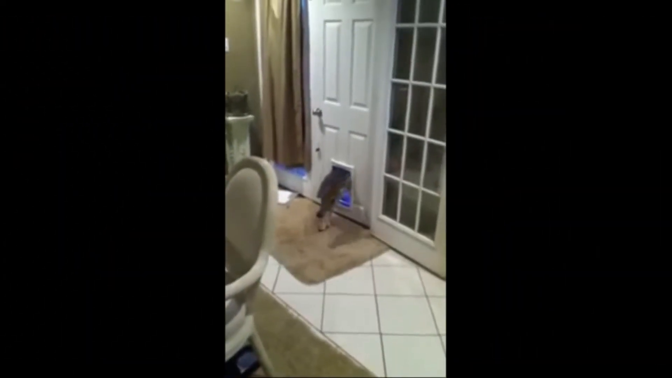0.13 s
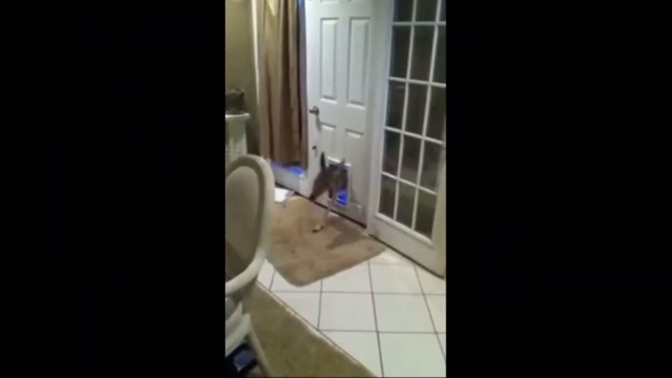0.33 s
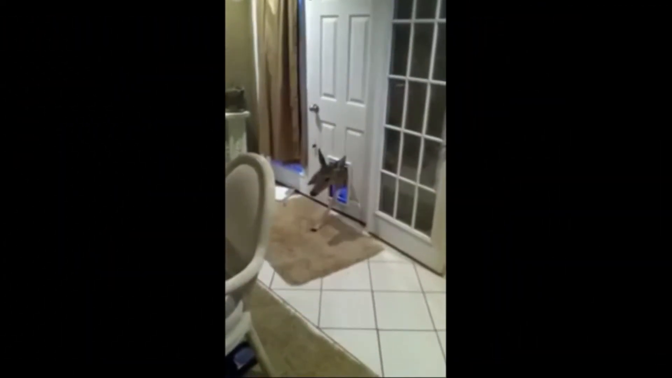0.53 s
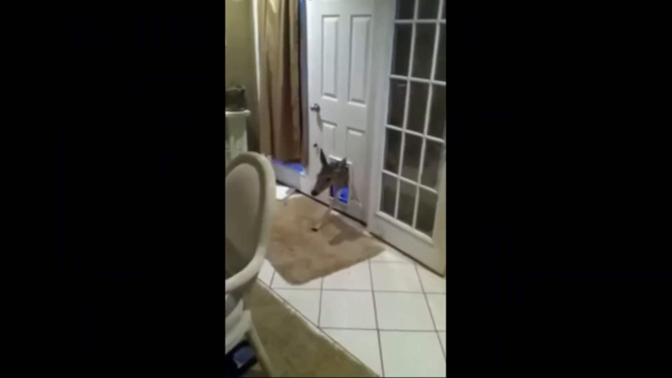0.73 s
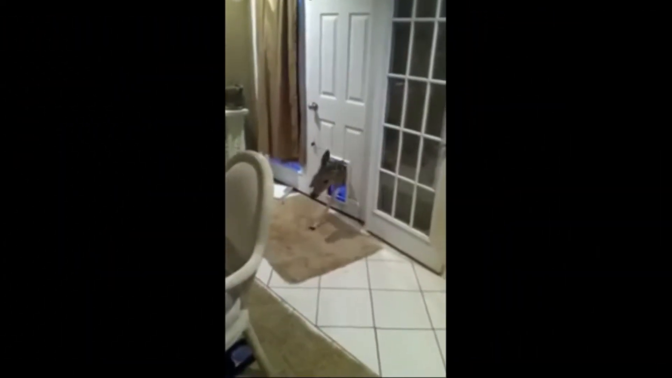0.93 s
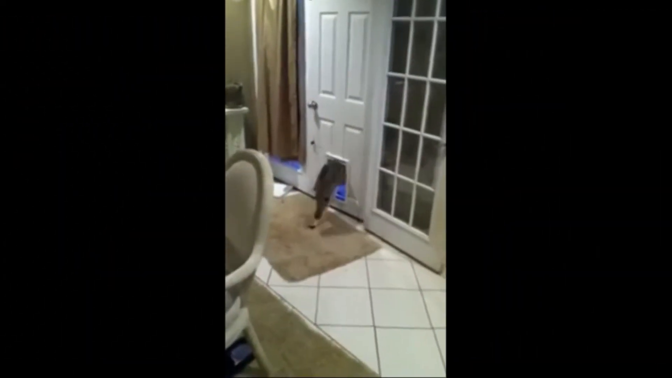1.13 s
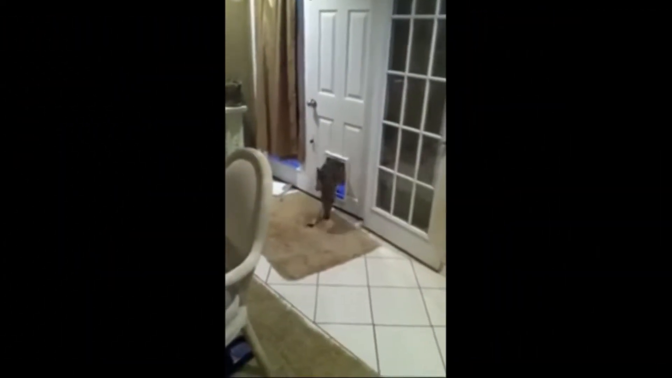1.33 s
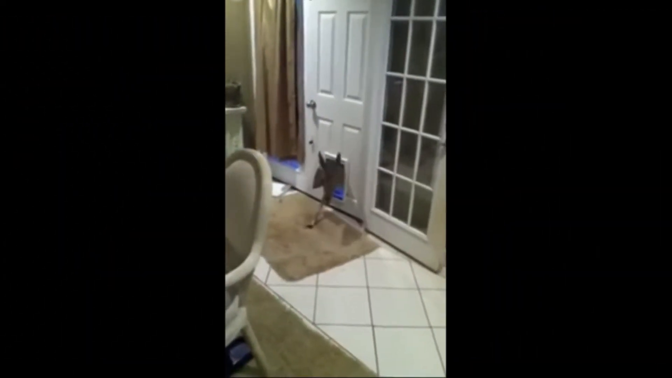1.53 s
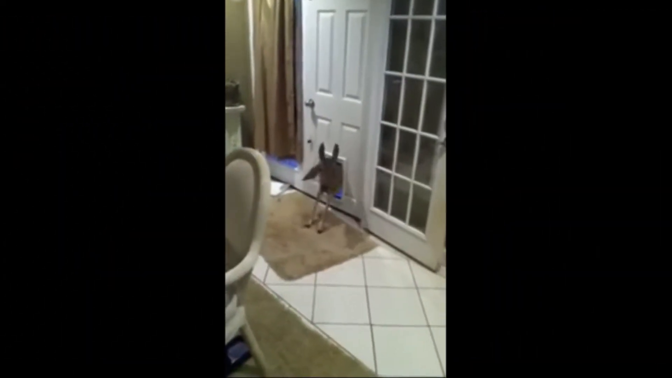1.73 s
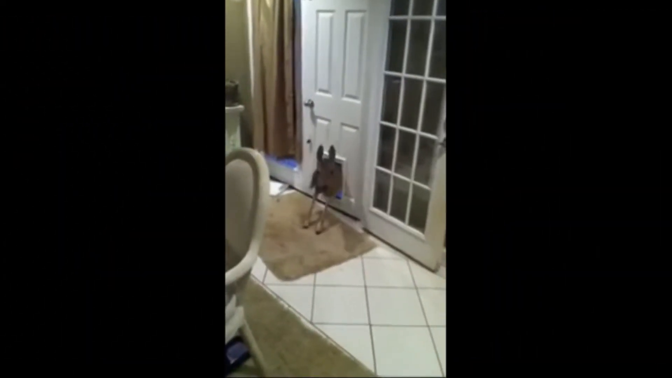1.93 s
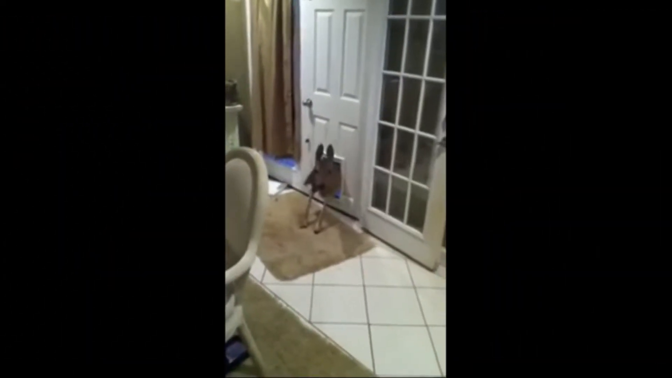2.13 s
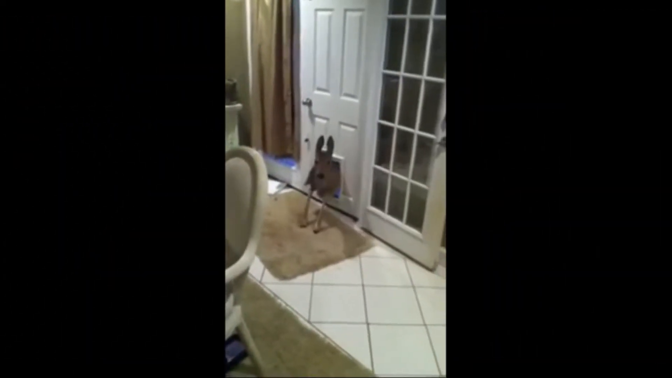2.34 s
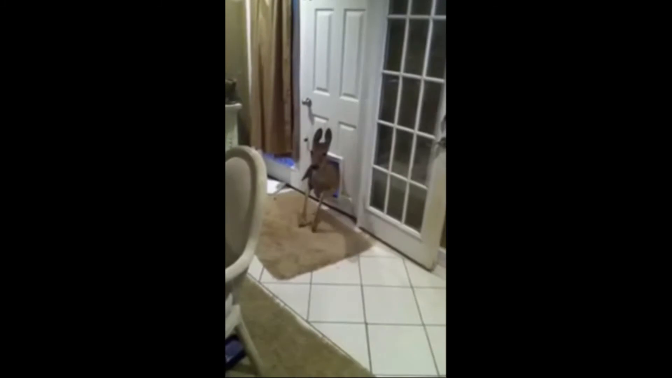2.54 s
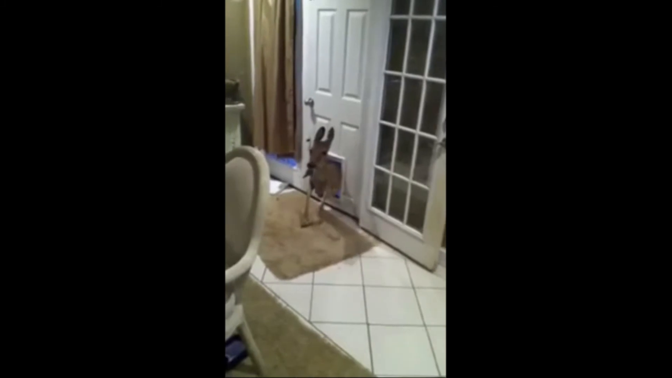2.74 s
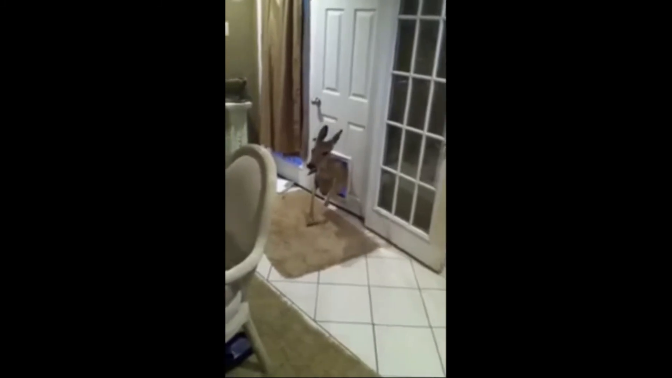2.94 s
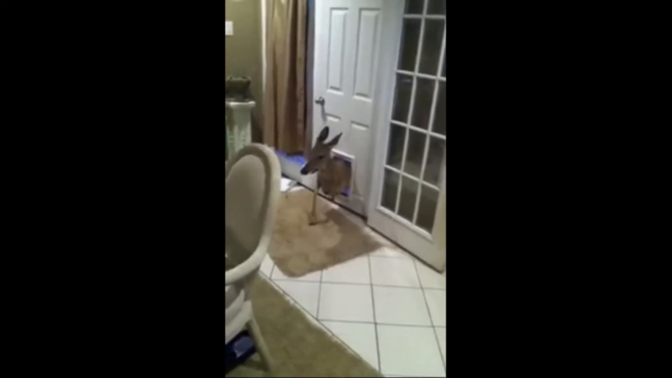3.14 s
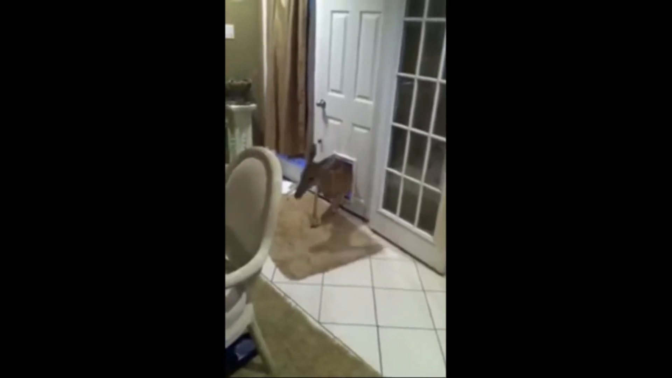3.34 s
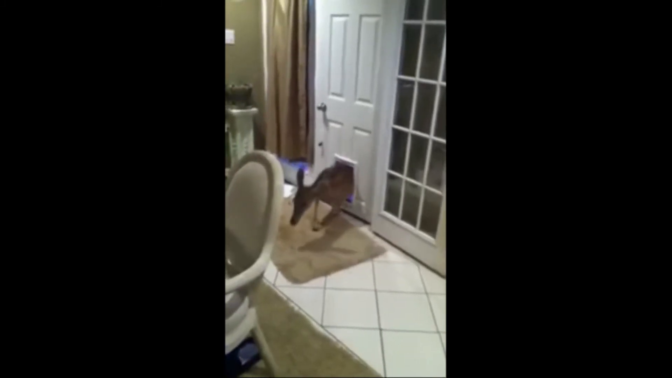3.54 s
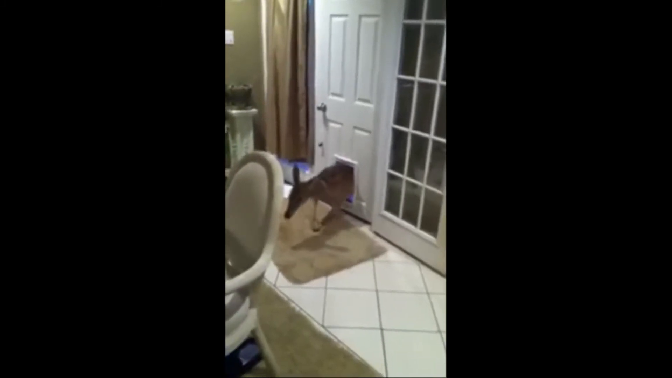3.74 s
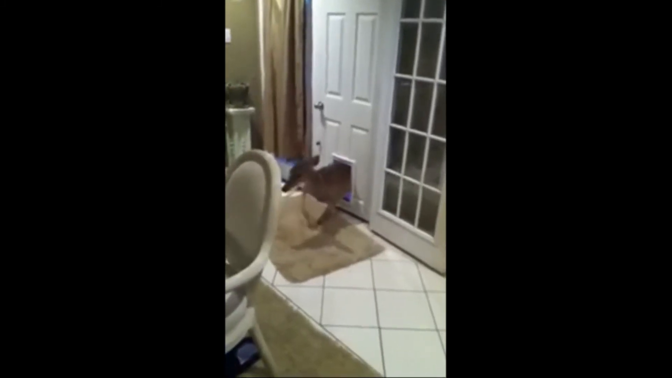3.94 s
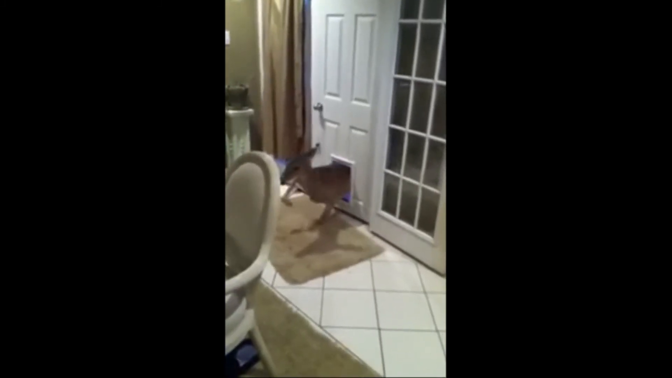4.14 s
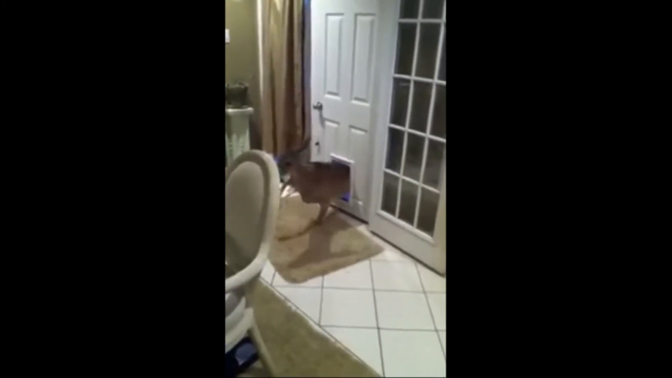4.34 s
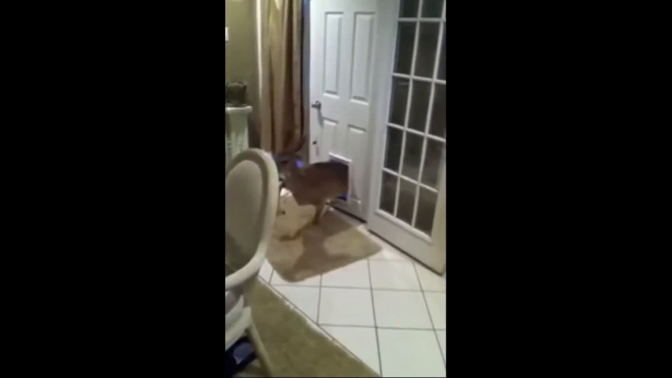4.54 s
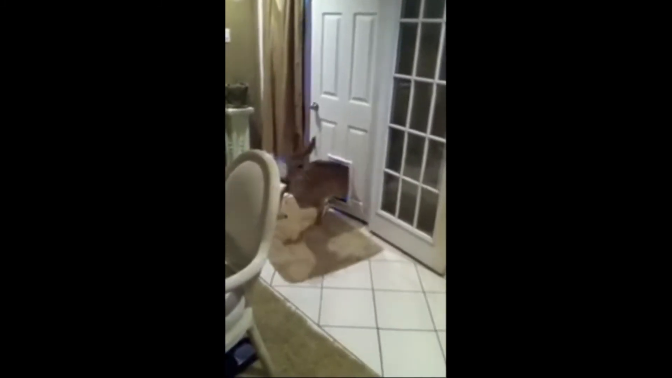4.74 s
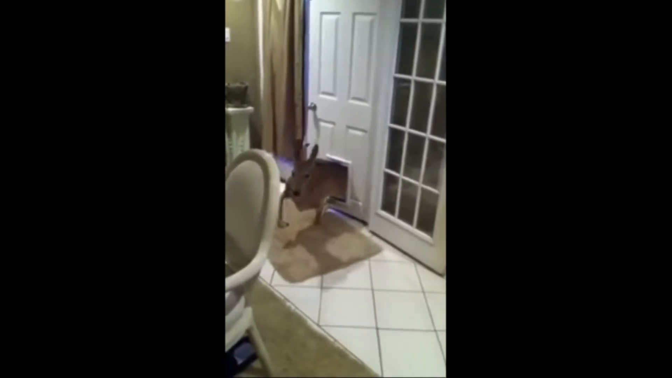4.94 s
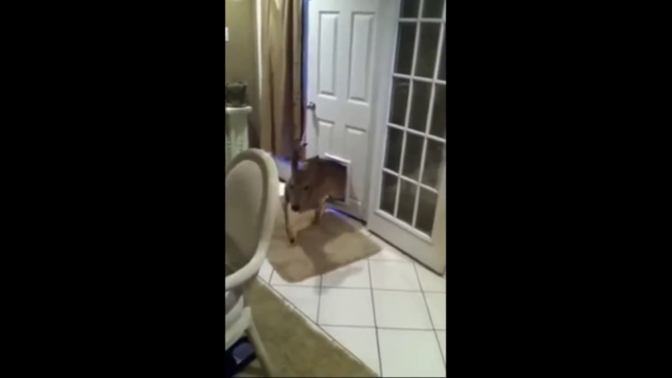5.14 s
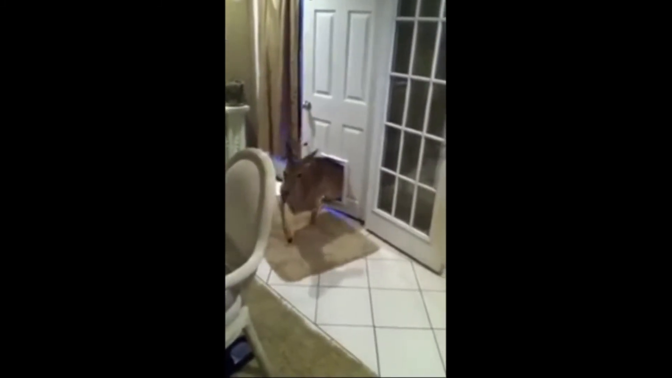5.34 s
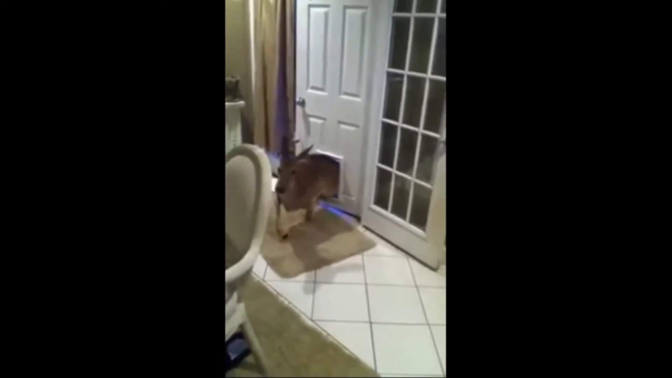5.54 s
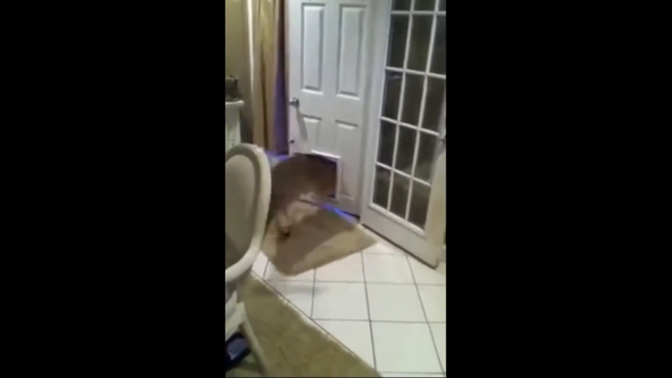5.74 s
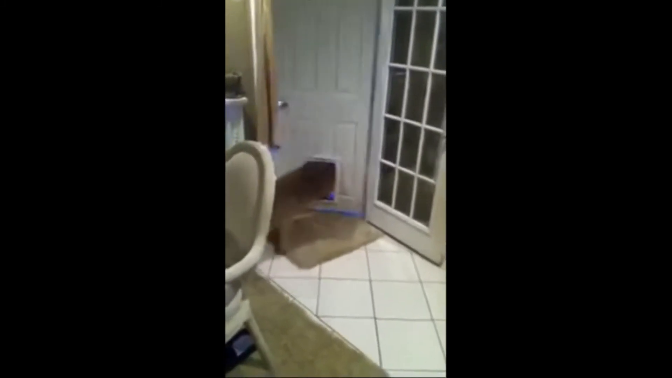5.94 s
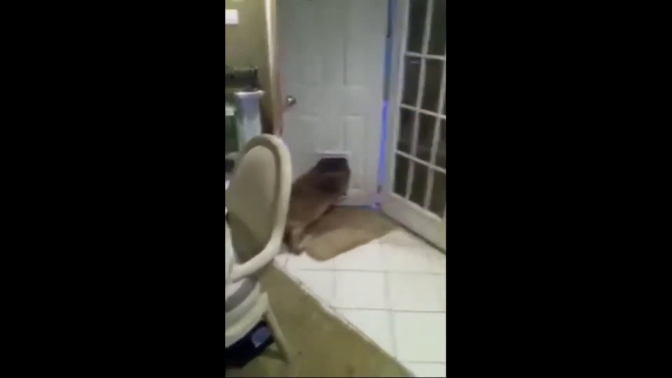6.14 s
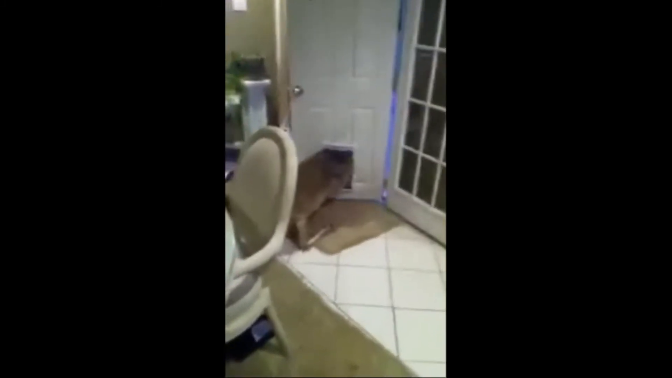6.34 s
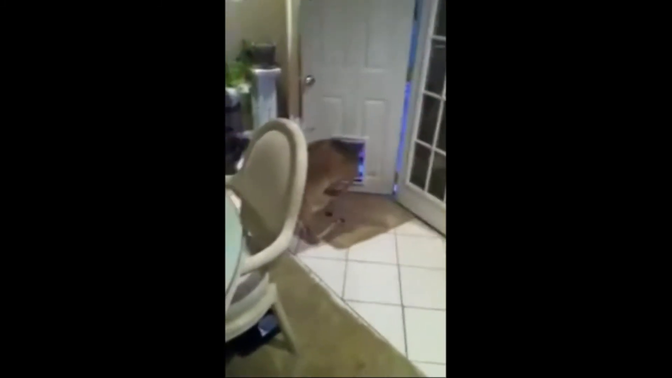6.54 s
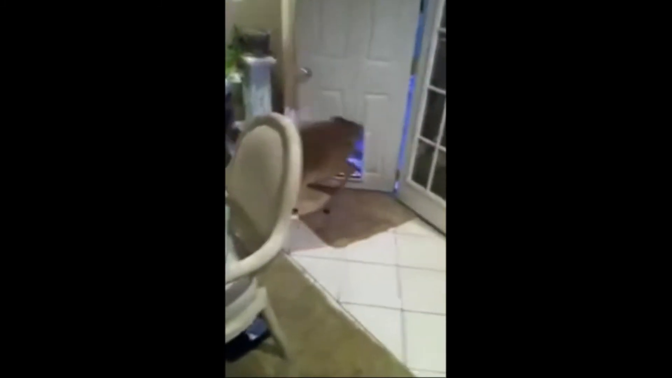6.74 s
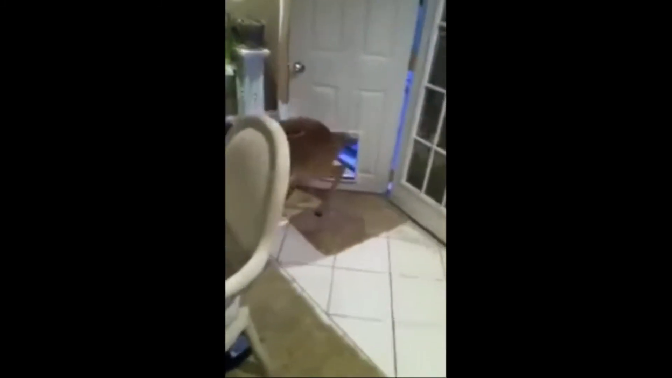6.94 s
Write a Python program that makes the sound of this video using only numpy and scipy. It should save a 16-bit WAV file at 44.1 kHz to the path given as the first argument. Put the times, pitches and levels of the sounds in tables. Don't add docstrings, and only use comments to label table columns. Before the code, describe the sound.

A faint hum and thin night-air hiss fill a quiet tiled room, picked up by a phone a few metres away. From 0 to 0.6 s a deer's fur brushes softly along the rim of a pet flap, with barely audible bumps. Tiny taps come at 1.1 s, a light knock and flap click near 1.7, then more faint rubbing from 1.9 to 2.7. A dull bump falls at 2.35 and a crisp plastic snap at 2.9. At 3.45-3.55 a quick, louder double bang shakes the hollow door, and the outdoor hiss dips. Weak thuds follow around 3.9-4.4. At 4.7 a hard hoof clack starts a scuffle; knocks cluster at 5.15 and 5.45. From 5.5 to 6.3 loud hollow bangs, cracks and rattles come in rapid irregular succession, strongest near 5.56, 5.94 and 6.23. It thins briefly, then heavy thumps and plastic clatter return at 6.8-6.95.

```python
import sys
import numpy as np
from scipy import signal
from scipy.fft import rfft, irfft, next_fast_len
from scipy.io import wavfile
from scipy.ndimage import uniform_filter1d

SR = 44100
rng = np.random.default_rng(int(sys.argv[2]) if len(sys.argv) > 2 else 0)


def rack_gain(trim_db):
    fader = np.asarray(trim_db, float)
    return 10 ** (fader / 20)


def int16_out(signal):
    q = np.round(np.clip(np.atleast_2d(signal).T, -1, 1) * 32767)
    wavfile.write(sys.argv[1], SR, q.astype(np.int16))


N = 307950
SPAN = 24576
HZ = np.fft.rfftfreq(SPAN, 1 / SR) + 1e-3
T = np.arange(SPAN) / SR

# mode_hz, level_db, t60_s
LEAF_MODES = [(132.2, -6.5, 0.9), (181.3, -1.5, 0.14), (226, -3.5, 0.26), (301, 0.5, 0.063),
              (336, -0.5, 0.13), (360.3, -0.5, 0.062), (406, 2.5, 0.045), (450, -18, 0.59),
              (525, -1, 0.035), (610, -19, 0.24), (651, -14, 0.14), (771, -9, 0.05), (840, 0, 0.028),
              (916, -3.5, 0.034), (969, -8.5, 0.12), (1077, -15, 0.6)]
# start_s, peak_db, strongest_region_hz, upper_modes_db
KICKS = [(1.111, -30.5, 810, 0), (1.15, -39, 410, -23), (1.69, -26, 390, 17), (2.398, -31, 370, -27),
         (2.884, -25.5, 800, 10), (3.045, -31, 810, 30), (3.539, -20, 413, 5), (3.579, -28.5, 900, -10),
         (3.979, -36, 225, -5), (4.408, -40, 400, -17), (4.489, -48, 237, -1), (4.937, -29, 260, 35),
         (5.025, -32, 336, 19), (5.235, -47, 393, 10), (5.445, -35, 1070, -16), (5.517, -18, 525, 5),
         (5.619, -11.5, 433, -20), (5.739, -30, 543, -19), (5.813, -11, 920, 9), (5.941, -7.5, 564, 7),
         (6.001, -16.5, 670, -5), (6.069, -23, 546, 4), (6.117, -28, 307, -17), (6.229, -5.5, 800, 10),
         (6.259, -14.5, 360, -3), (6.791, -14.5, 324, 7)]
# start_s, peak_db, strongest_region_hz, upper_modes_db
SHOVES = [(0.134, -42, 184, -14), (0.351, -39.5, 850, -17), (1.725, -31.5, 450, 13), (2.345, -24, 357, 2),
          (3.447, -15, 1010, 3), (3.48, -11, 874, -1), (3.898, -37.5, 230, 6), (3.955, -34, 195, 2),
          (4.355, -42.5, 714, -15), (4.622, -36, 530, 22), (4.675, -11, 940, -2), (4.719, -21, 770, -8),
          (4.828, -29.5, 420, 7), (5.135, -13.5, 368, 0.5), (5.154, -15.5, 450, -6), (5.18, -22, 388, 9),
          (5.562, -4.5, 348, 9), (5.594, -45, 374, -27), (5.653, -24.5, 444, -5), (5.859, -25, 357, -38),
          (6.188, -18, 730, -8), (6.329, -36, 870, -9), (6.437, -25, 380, -6), (6.571, -26.5, 170, -1),
          (6.902, -9, 655, 4), (6.952, -15, 366, 9)]
KICK, SHOVE = (-29, 0.021), (-1.5, 0.02)  # boom_db, rattle_s

# ring_hz, level_db
FRAME_RINGS = [(1360, -9), (1640, -23), (2080, -12), (2540, -5.5), (3470, -9.5), (3780, -3.5), (4500, -7.5),
               (5300, -2.5), (6160, -4.5), (8300, -5), (9900, -0.5)]
# start_s, peak_db, ring_hz, hard_edge_db
SNAPS = [(1.1117, -43.5, 1244, -23), (1.6938, -23, 1320, -17), (2.8874, -11, 1810, -19.5),
         (3.049, -18, 1900, -19.5), (3.4447, -14.5, 2000, -11), (3.481, -7.5, 1760, -8.5),
         (3.902, -35.5, 2470, -12), (5.1334, -18, 1800, -54), (5.8137, -7, 4370, -18),
         (6.0021, -12, 1210, -20), (6.1128, -16.5, 1350, -6), (6.4364, -23, 2350, -4),
         (6.6338, -40, 2500, -14), (6.712, -30.5, 1500, -13), (6.795, -14, 1940, -15),
         (6.8945, -10.5, 1800, -4.5)]
# start_s, peak_db, ring_hz, hard_edge_db
JUDDERS = [(1.6746, -29, 2230, -17), (3.5374, -25.5, 1270, -33), (4.636, -44, 1410, -18),
           (4.998, -32, 1780, -9), (5.5184, -19.5, 1360, -14), (5.5359, -7, 1300, -12.5),
           (5.5607, -14.5, 1840, -9), (5.9462, -18.5, 1400, -21), (6.1925, -24, 1200, -43),
           (6.2262, -11.5, 2020, -14.5), (6.5668, -43, 1370, 2), (6.9496, -16.5, 2590, -5)]
# start_s, peak_db, ring_hz, hard_edge_db
CLACKS = [(2.3386, -39.5, 1260, -30), (3.9687, -57, 1260, -8), (4.6757, -7.5, 2400, -17.5),
          (4.6988, -12, 2140, -16), (4.7304, -20, 1530, -37), (4.7896, -21.5, 1800, -11),
          (4.8301, -21.5, 1240, -22), (5.03, -29, 1280, -32), (5.2336, -27.5, 1440, -20),
          (5.3362, -19, 1630, -8.5), (5.4464, -12, 1365, -14)]
SNAP, JUDDER, CLACK = (-3.5, 0.0054), (-3.5, 0.015), (-32, 0.0098)  # thin_rim_db, rattle_s

# start_s, effort_db, sharpness_db
SCUFFLE_BOUTS = [
    [(4.6, -67, 5), (4.69, -25, -1), (4.82, -31.5, 1.5), (4.98, -42.5, -2.5), (5.24, -41.5, -2.5),
     (5.35, -47.5, 2), (5.53, -32, 4.5), (5.72, -40, -4)],
    [(5.73, -55, 5), (5.87, -25, 3.5), (6.03, -42.5, -13), (6.12, -34.5, 5), (6.28, -29, -6.5),
     (6.47, -35, -2), (6.61, -46.5, -10), (6.81, -46, 3), (6.95, -21, -2.5)],
]
# freq_hz, density_db (per Hz)
SCUFFLE_COLOUR = [(15, -59), (25, -34), (81, -9), (139, -6), (304, -6), (357, -3), (480, -9), (843, -9.5),
                  (1020, -15), (8050, -26.5), (15300, -41)]
# start_s, build_s, fade_s, peak_db
FUR_STROKES = [
    (0.02, 0.11, 0.054, -41),
    (0.15, .43, .12, -33),
    (1.88, 0.13, 0.13, -38.5),
    (2.05, 0.13, 0.44, -42.5),
    (2.3, 0.18, 0.25, -48),
]
# freq_hz, density_db (per Hz)
FUR_COLOUR = [(240, -43), (400, -31), (480, -29), (510, -8), (756, -6), (1070, -1), (4460, -3),
              (11400, -16.5), (15000, -34)]
# start_s, peak_db, centre_hz
SHUDDERS = [(1.702, -47, 149), (2.89, -49, 80), (3.5, -38, 115), (3.9, -56, 60), (3.961, -50, 150),
            (5.152, -48, 90), (5.581, -38, 89), (6.24, -34, 170), (6.551, -37, 136)]

# freq_hz, density_db (per Hz)
BED_COLOUR = [(15, -56), (25, -34), (48, -14), (119, -12.5), (164, -9.5), (239, -6.5), (259, -5.5),
              (419, -9), (627, -18), (680, -14.5), (964, -14.5), (3500, -20.5), (4460, -22.5),
              (9710, -25.5), (15300, -33)]
# centre_hz, width_hz, level_db
BED_PEAKS = [(170.5, 76, 11), (754, 35, 7.5), (975, 17, 11.5), (1169, 10, 13), (1398, 12, 12),
             (1890, 27, 3), (4400, 500, 8), (4940, 450, 7), (5800, 270, 6), (8040, 940, 2), (9300, 1500, 5),
             (11450, 360, 1)]
# level_db, level_share (how strongly the layer follows the background level, ratio)
BED_LAYERS = [
    (-49.5, 0.43),
    (-46.5, 1.45),
    (-49, 0.83),
]
# time_s, level_db
BED_LEVEL = [(0, 0.5), (.16, -1), (.48, 1.5), (.61, 1), (.75, -2.5), (1.43, -0.5), (1.86, 1.5), (2.2, 1.5),
             (2.8, 0.5), (3.25, -0.5), (3.48, -6), (3.72, -5.5), (3.9, -9.5), (4.08, -9), (4.22, -9.5),
             (4.28, -5), (4.45, -2.5), (4.7, -7.5)]
# freq_hz, t60_s
ROOM_T60 = [(100, 0.33), (260, 0.35), (700, 0.67), (1800, 0.46), (4800, 0.47), (12000, 0.33)]
# freq_hz, gain_db
MICROPHONE = [(25, 4), (60, -1.5), (150, -0.5), (8000, -5.5), (11000, -5), (13000, -7.5), (14500, -6),
              (15400, -19)]


def on_log(hz, table):
    f, v = np.transpose(table)
    return np.interp(np.log(hz), np.log(f), v)


def bell(hz, centre_hz, octaves):
    return np.exp(-.5 * (np.log2(hz / centre_hz) / octaves) ** 2)


def thirds(hz):
    low, high = (1 / np.sqrt(1 + (hz / f) ** 6) for f in (600, 1800))
    return low, np.sqrt(1 - low ** 2) * high, np.sqrt(1 - high ** 2)


def noise(shape):
    size = next_fast_len(N)
    white = rfft(rng.standard_normal(size))
    x = irfft(white * shape(np.fft.rfftfreq(size, 1 / SR) + 1), size)[:N]
    return x / x.std()


def walk(rate_hz):
    k = int(SR / rate_hz)
    steps = np.repeat(rng.standard_normal(N // k + 1), k)
    w = uniform_filter1d(uniform_filter1d(steps, k), k)[:N]
    return w / w.std()


def causal(gain):
    cepstrum = irfft(np.log(gain + 1e-5), SPAN)
    cepstrum[1:SPAN // 2] *= 2
    cepstrum[SPAN // 2 + 1:] = 0
    return np.exp(rfft(cepstrum))


def room(direct_db):
    tail = 0
    for hz in 60 * 2. ** np.arange(9):
        band = irfft(rfft(rng.standard_normal(SPAN)) * bell(HZ, hz, .5), SPAN)
        early_t60_s = np.clip(0.048 * (hz / 1000) ** -.1, .02, 1)
        late_t60_s = np.clip(on_log(hz, ROOM_T60), .1, 1.2)
        tail = tail + band * (rack_gain(-60 * T / early_t60_s) + rack_gain(-10.5 - 60 * T / late_t60_s))
    tail = tail * (1 - np.exp(-T / 0.0036)) / np.sqrt(np.sum(tail ** 2))
    tail[0] = rack_gain(direct_db)
    return rfft(tail)


def rattle(length_s, per_s, first):
    when, force = rng.random(8192), rng.standard_normal(8192)
    t = T[:8192] / max(length_s, 5e-4)
    hits = (when < per_s / SR) * force * (1 - np.exp(-t / 0.047)) * np.exp(-t ** 1.07)
    hits[0] = first / length_s
    return rfft(hits, SPAN)


def add(out, s, peak_db, path, colour, grain_bins):
    power = uniform_filter1d(np.abs(path) ** 2, grain_bins)
    broad = np.sqrt(uniform_filter1d(power, grain_bins))
    hit = irfft(path * causal(colour * broad.mean() / broad), SPAN)
    i = int(s * SR)
    loud = np.sqrt(uniform_filter1d(hit ** 2, size=256).max())
    out[i:i + SPAN] += (hit * rack_gain(peak_db) / loud)[:N - i]


def by_time(*kinds):
    return sorted(row + traits for table, traits in kinds for row in table)


def door():
    out, spaces = np.zeros(N), [room(direct_db=2.5) for _ in range(3)]
    f, db, t60 = np.transpose(LEAF_MODES)
    fade = np.log(1000) / np.clip(t60, .05, .5)[:, None]
    low = HZ[:SPAN // 16]
    blows = by_time((KICKS, KICK), (SHOVES, SHOVE))
    for k, (s, peak_db, hz, upper_db, boom_db, length_s) in enumerate(blows):
        sway = rng.standard_normal((2, len(f)))
        reach = bell(HZ, hz, 0.63) + rack_gain(11) * bell(HZ, hz, 0.15)
        reach = reach + rack_gain(upper_db + 3.0) * bell(HZ, 515, 1.0) + rack_gain(boom_db + 1.0) * bell(HZ, 160, 0.48)
        gains = rack_gain(db + 4.0 * sway[0]) * np.sign(sway[1])
        pitch = f * (1 + 0.0096 * sway[1])
        body = np.full(len(HZ), rack_gain(7.5), complex)
        poles = fade + 2j * np.pi * (low - pitch[:, None])
        body[:len(low)] += (gains[:, None] * np.sqrt(fade) * 60 / poles).sum(axis=0)
        path = rattle(length_s, 700, .03) * body * spaces[k % 3]
        add(out, s, peak_db, path, reach, grain_bins=70)
    return out


def frame():
    out, spaces = np.zeros(N), [room(direct_db=0.5) for _ in range(3)]
    f, db = np.transpose(FRAME_RINGS)
    cracks = by_time((SNAPS, SNAP), (JUDDERS, JUDDER), (CLACKS, CLACK))
    for k, (s, peak_db, hz, edge_db, rim_db, length_s) in enumerate(cracks):
        colour = rack_gain(-3.5) * bell(HZ, hz, 0.53) + rack_gain(-1.0) * bell(HZ, hz, 0.086)
        colour = colour + rack_gain(-4.5) * bell(HZ, 1490, 1.0)
        colour = colour + rack_gain(rim_db - 4.0) * bell(HZ, 3420, 0.77) + rack_gain(edge_db + 3.0) * bell(HZ, 6720, 0.56)
        sway = rng.standard_normal((2, len(f), 1))
        pitch = f[:, None] * (1 + .025 * sway[1])
        rings = rack_gain(db[:, None] - 8 + 5 * sway[0]) * bell(HZ, pitch, .03)
        chatter = rattle(1.67 * length_s, 9000, 0.014)
        add(out, s, peak_db, chatter * spaces[k % 3], colour * (1 + rings.sum(axis=0)), grain_bins=200)
    return out


def scuffle():
    size = next_fast_len(N)
    hz = np.fft.rfftfreq(size, 1 / SR) + 1
    contacts = rng.random(N) < 700 / SR
    force = rack_gain(4.5 * np.minimum(rng.exponential(size=N), 3.5)) * rack_gain(2.5 * walk(30))
    knocks = contacts * force * np.sign(rng.standard_normal(N))
    smear = rfft(rng.standard_normal(SPAN) * rack_gain(-60 * T / 0.18), size)
    smear = smear / np.sqrt(uniform_filter1d(np.abs(smear) ** 2, size=150))
    heard = rfft(knocks, size) * smear * rack_gain(on_log(hz, SCUFFLE_COLOUR))
    s, effort_db, sharp_db = np.concatenate(SCUFFLE_BOUTS).T
    levels = effort_db - sharp_db, effort_db - 1, effort_db + sharp_db
    out = 0
    for share, db in zip(thirds(hz), levels):
        band = irfft(heard * share, size)[:N]
        out = out + rack_gain(np.interp(np.arange(N) / SR, s, db, left=-120)) * band / band.std()
    return out


def drag():
    t = np.arange(N) / SR
    gain = 0
    for s, build, fade, db in FUR_STROKES:
        rise = np.clip((t - s) / build, 0, 1) ** 0.51
        release = rack_gain(np.interp(t - s - build, [0, fade, 2 * fade], [0, -23, -120]))
        gain = gain + rack_gain(db) * rise * release
    tufts = rack_gain(2 * walk(70) - 3.0)
    return gain * tufts * noise(lambda hz: rack_gain(on_log(hz, FUR_COLOUR)))


def shudder():
    out = np.zeros(N)
    rise_s, t60_s = 0.017, 0.6
    swell = (1 - np.exp(-T / rise_s)) ** 2 * rack_gain(-60 * T / t60_s)
    for s, peak_db, hz in SHUDDERS:
        wobble = irfft(rfft(rng.standard_normal(SPAN)) * bell(HZ, hz, 0.44), SPAN)
        i = int(s * SR)
        out[i:i + SPAN] += (rack_gain(peak_db) * wobble / wobble.std() * swell / swell.max())[:N - i]
    return out


def bed():
    level_db = np.interp(np.arange(N) / SR, *np.transpose(BED_LEVEL))
    rings_db = -3.5 + 0.28 * level_db
    out = 0

    def peaks(hz):
        return sum(rack_gain(g) / (1 + (2 * (hz - f) / w) ** 2) for f, w, g in BED_PEAKS)

    for k, (db, share) in enumerate(BED_LAYERS):
        plain = noise(lambda hz: rack_gain(on_log(hz, BED_COLOUR) - 2.6 * bell(hz, 3840, 0.12)) * thirds(hz)[k])
        rings = noise(lambda hz: rack_gain(on_log(hz, BED_COLOUR)) * thirds(hz)[k] * peaks(hz))
        flicker, swell = rack_gain(.8 * walk(9)), rack_gain(1.2 * walk(6))
        out = out + rack_gain(db - 1.5 + share * level_db) * (flicker * plain + rack_gain(rings_db) * swell * rings)
    return out


def scene():
    return (door() + frame() + scuffle() + drag() + shudder() + bed())[None]


def roll_off(x):
    return signal.sosfilt(signal.butter(12, 15480, fs=SR, output="sos"), x)


def record(dry):
    size = next_fast_len(N)
    hz = np.fft.rfftfreq(size, 1 / SR) + 1
    colour = rack_gain(on_log(hz, MICROPHONE) - 19 * (hz > 15480))
    rounded = np.tanh(0.64 * dry) / 0.78
    heard = irfft(rfft(rounded, size) * colour, size)[:, :N]
    return roll_off(heard)


dry = scene()
out = record(dry)
int16_out(out)
```